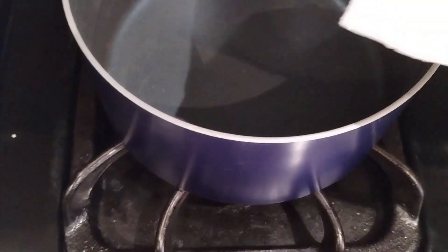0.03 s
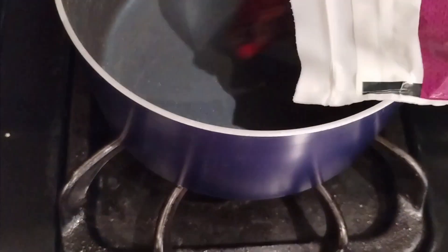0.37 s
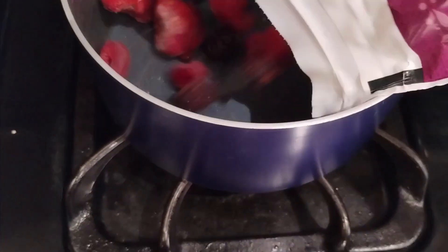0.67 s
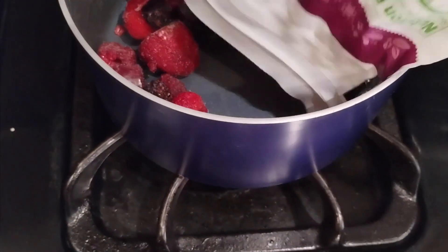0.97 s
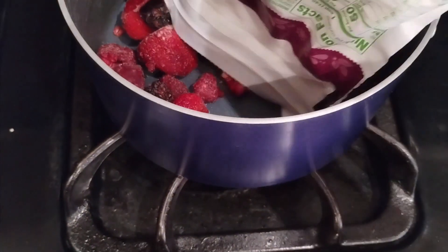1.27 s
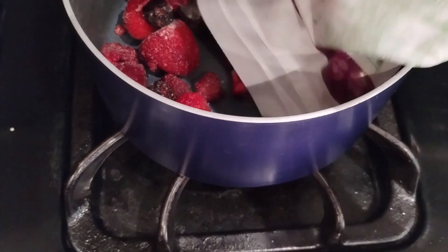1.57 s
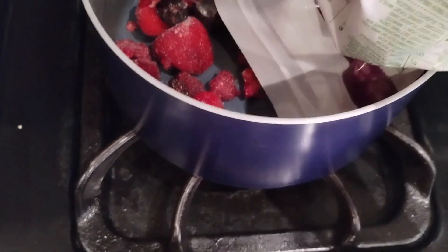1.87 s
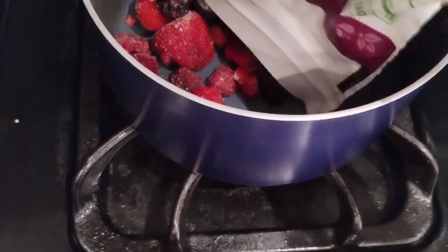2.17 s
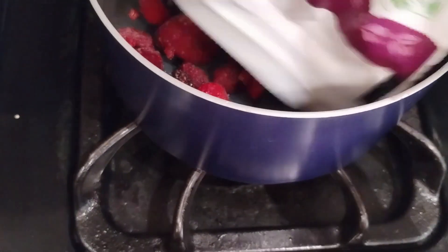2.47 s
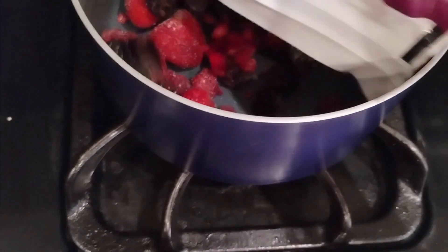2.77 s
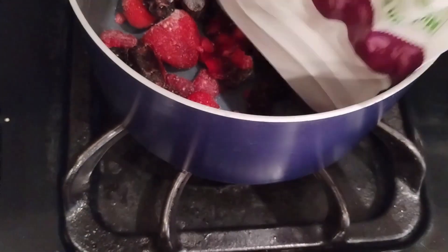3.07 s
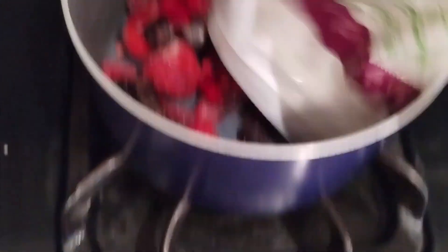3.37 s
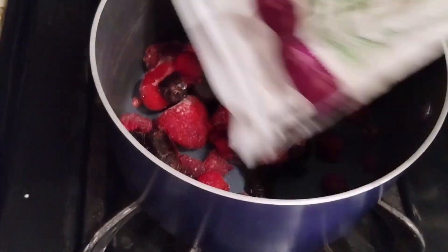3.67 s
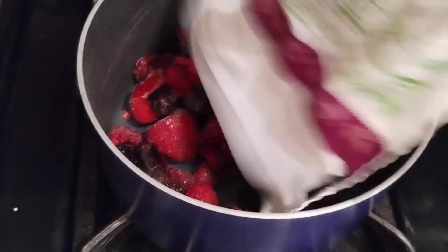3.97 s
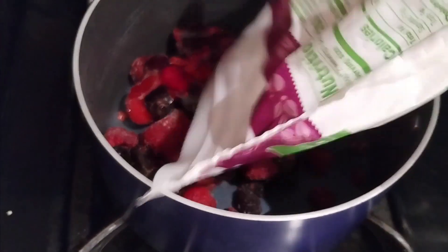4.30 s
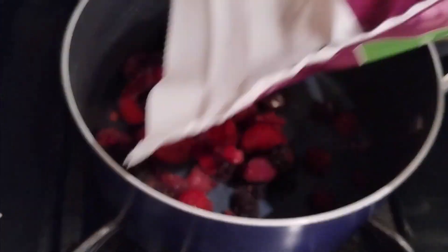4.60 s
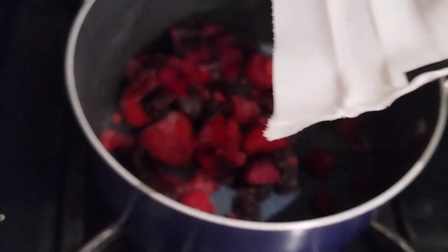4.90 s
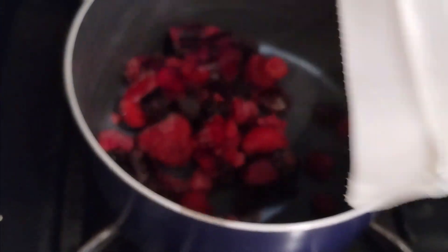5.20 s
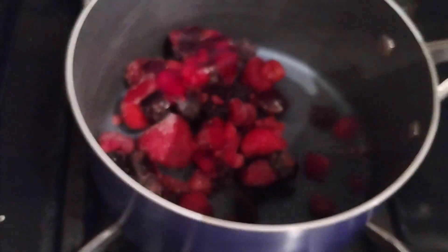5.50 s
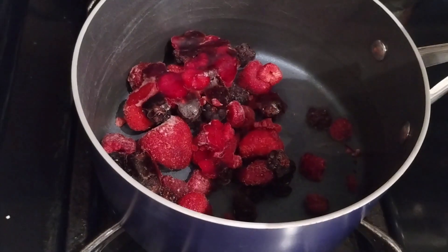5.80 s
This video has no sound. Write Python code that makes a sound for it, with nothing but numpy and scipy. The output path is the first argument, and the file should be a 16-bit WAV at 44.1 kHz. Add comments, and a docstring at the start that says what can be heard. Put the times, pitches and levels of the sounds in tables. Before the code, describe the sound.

A stiff plastic bag is shaken and crackles up close as hard frozen berries clatter onto a metal pan bottom.

```python
"""Frozen berries pour from a stiff plastic bag into a metal saucepan, close to a stereo microphone.
The bag crinkles and snaps as its creases buckle, and the berries tumble and clack together. They drop
out to knock and chatter on the pan bottom, which rings less as the heap grows; the pan rocks on its
stove grate. The empty bag is lifted away with a last crack, and a small, quiet kitchen answers."""
import sys
import numpy as np
from scipy import signal
from scipy.fft import rfft, irfft, next_fast_len
from scipy.io import wavfile
from scipy.ndimage import map_coordinates

SR = 44100
rng = np.random.default_rng(int(sys.argv[2]) if len(sys.argv) > 2 else 0)


def file_out(sig):
    """Save sig as 16-bit WAV at sys.argv[1]."""
    # one column per channel
    cols = np.atleast_2d(sig).T
    # limit, then scale
    lim = np.clip(cols, -1, 1)
    pcm = np.round(lim * 32767).astype(np.int16)
    wavfile.write(sys.argv[1], SR, pcm)


N = 257984

# Levels are relative; the functions set the balance.
# how hard the hand works the bag between shakes: t/s, level/dB
GRIP = [(0, -41.5), (.15, -31), (.45, -35), (1.2, -31), (1.3, -26.5), (1.55, -32.5), (1.9, -32),
        (2.3, -27.5), (2.9, -25), (3.11, -26.5), (3.2, -23), (3.75, -28.5), (3.85, -28), (4.15, -22),
        (4.35, -32.5), (4.55, -37.5), (4.68, -35.5), (4.71, -57.5), (5.15, -65.5), (5.4, -77)]
# shakes and squeezes of the bag: t/s, length/s, film level/dB, berry level/dB
BAG_SHAKES = [(0.173, 0.47, -21, -43), (0.335, 0.21, -19, -33.5), (0.99, 0.11, -26, -39.5),
              (1.413, 0.09, -25.5, -39), (1.633, 0.13, -24.5, -38.5), (1.801, 0.019, -26.5, -35),
              (1.911, 0.21, -27, -37), (2.206, 0.048, -29, -36), (2.395, 0.078, -17.5, -34.5),
              (2.575, 0.031, -12.5, -35), (2.641, 0.052, -11, -37.5), (2.769, 0.056, -22, -35),
              (2.883, 0.19, -21.5, -39.5), (3.135, 0.056, -16.5, -35), (3.278, .11, -16, -33.5),
              (3.416, 0.047, -19, -34.5), (3.469, 0.09, -11.5, -33), (3.649, 0.089, -15.5, -32.5),
              (3.889, 0.022, -11.5, -29), (3.954, 0.1, -14.5, -37.5), (4.058, 0.019, -9, -36.5),
              (4.206, 0.04, -11.5, -34.5), (4.275, 0.017, -9.5, -38), (4.364, 0.12, -21.5, -39.5)]
# spectra of the heavy bag flexing, berries tumbling in it and its film crinkling: f/Hz, level/dB
FLEX_SPECTRUM = [(24, -49), (40, -12.5), (145, -1), (436, -8.5), (650, -42), (1100, -120)]
TUMBLE_SPECTRUM = [(60, -36), (200, -3.5), (400, -1.5), (750, 5.5), (1200, 2.5), (1700, -1.5), (2600, 1.5),
                   (5000, -5)]
FILM_SPECTRUM = [(410, -5.5), (700, 2.5), (852, -28.5), (1210, -2.5), (1560, -9), (2490, 2.5), (2880, 1),
                 (3740, -5), (7590, -7), (9350, -1), (12300, -17), (16000, -23.5)]
# creases snapping through: t/s, level/dB, brightness/dB
CREASE_SNAPS = [(.179, -10.5, -12.5), (0.214, -12, -14), (0.279, -0.5, -8.5), (.322, -10, -21.5),
                (.342, -5.5, -13.5), (0.407, -4.5, -15.5), (0.493, -7.5, -8), (0.496, -4.5, -20),
                (1.597, -7.5, -18), (1.685, -10, -27), (1.696, -7.5, -9.5), (1.740, -0.5, -6),
                (1.799, -1.5, -17.5), (1.831, -10.5, -20.5), (1.937, -13, -22.5), (2.140, -9, -18),
                (2.236, -5, -24), (2.454, -9, -15), (2.536, -16, -15), (2.583, -5, -13), (2.6, -10.5, -12),
                (2.619, -1.5, -13.5), (2.637, -7, -11.5), (2.649, -4.5, -13), (2.692, -8, -21.5),
                (2.778, -6, -15), (2.806, -5, -26.5), (3.154, -1.5, -15.5), (3.169, -10.5, -18.5),
                (3.21, -4, -12), (3.219, -8.5, -20), (3.45, -8, -18), (3.489, -7, -30.5),
                (3.525, -8.5, -14.5), (3.543, -7, -15), (3.617, -5.5, -23.5), (3.777, -11, -20),
                (3.807, -6.5, -11), (3.875, -8, -16), (3.916, -11, -11), (3.937, -3.5, -13),
                (3.988, -10, -14.5), (4.042, -6, -17), (4.127, -4, -14), (4.158, -6, -15), (4.219, -7, -17),
                (4.273, -8.5, -10), (4.290, -8.5, -14), (4.301, -3.5, -12), (4.395, -11.5, -13.5),
                (4.427, -7.5, -10), (4.489, -9.5, -15), (4.504, -8, -8.5), (4.516, -4, -14.5),
                (4.522, -8.5, -26.5), (4.556, -15, -16.5), (4.607, -20, -16), (4.667, -18.5, -32),
                (4.795, -26, -16), (5.694, -37, -14)]
# bag and pan bumping the grate: t/s, level/dB
GRATE_BUMPS = [(0.424, -19.5), (1.048, -23.5), (1.463, -29), (1.522, -34.5), (1.753, -20), (2.019, -23.5),
               (2.771, -22.5), (3.027, -26.5), (3.141, -26.5), (3.342, -23.5)]
# berries landing: t/s, level/dB, bottom mode f/Hz, second mode/dB, chatter/dB, favoured overtone f/Hz
BERRY_LANDINGS = [(.502, -15.5, 628, -10, -13.5, 3120), (.565, -8, 637.5, -12, 1, 3080),
                  (.619, -10.5, 650, -11.5, 0, 8800), (.651, -19.5, 711, -0.5, 7, 3700),
                  (0.657, -26.5, 717, -7.5, 17.5, 5300), (.671, -24.5, 643, 4.5, -1, 2535),
                  (.693, -27, 616, 4.5, -2, 2430), (.716, -17, 653, -4.5, 11, 7200),
                  (.776, -20, 622.5, -17.5, 8.5, 3820), (.802, -16.5, 667, -6, 7.5, 3880),
                  (.817, -21, 634, -3.5, 7.5, 5860), (0.867, -15.5, 644, -6.5, 9, 6720),
                  (.963, -20, 660, -1, 4, 2390), (1.011, -14, 627, 0, -10.5, 2510),
                  (1.041, -14.5, 696, -1.5, -16, 3770), (1.154, -13, 677, -14, 7, 9180),
                  (1.172, -31.5, 676, -8.5, 7, 5000), (1.332, -4, 640, -11.5, 0.5, 2370),
                  (1.344, -21, 632, 8, 1, 3570), (1.492, -9.5, 665, -6, -12, 2560),
                  (2.483, -12.5, 665, -10, -2, 2520), (2.77, -4, 631, -22.5, -13.5, 3080),
                  (2.803, -15, 690, 0, 6.5, 2550), (2.878, -5.5, 684, -14, 0.5, 3650),
                  (3.024, -4.5, 664, -3.5, -19.5, 3060), (3.333, -4.5, 682, -2.5, -14, 3700),
                  (3.494, -8.5, 650, 0.5, -11, 9300)]
# the pan bottom's low modes, kept singing by rolling berries: f/Hz, width/Hz, level/dB
BOTTOM_MODES = [(636, 22, 0), (1296, 24, 7), (2535, 40, -5)]
# the pan bottom's overtones: f/Hz, level/dB
BOTTOM_OVERTONES = [(2537, -15.5), (3085, -18), (3775, -17), (4550, -20), (4970, -21), (5463, -19),
                    (7055, -22), (7373, -22), (8740, -21)]
# spectra of ice skidding on metal, a landing's thud, a big berry's thump and a dry knock: f/Hz, level/dB
SKID_SPECTRUM = [(880, -38.5), (1600, -8), (2490, -6.5), (2800, -12.5), (3150, -3.5), (4200, -4.5),
                 (6000, -2.5), (7100, -7.5), (9010, -2.5), (11500, -14.5), (16000, -31)]
THUD_SPECTRUM = [(250, -22), (700, 6), (5000, 4), (9000, -19.5)]
THUMP_SPECTRUM = [(30, -20), (100, 9), (250, -13.5), (900, -47), (3000, -89)]
KNOCK_SPECTRUM = [(400, 1.5), (1000, 1.5), (3500, -3.5), (8000, -14.5)]
# berries striking each other, and at the end the empty bag's edge touching the pan: t/s, level/dB, f/Hz
DRY_KNOCKS = [(0.8699, -4.5, 7060), (1.1539, -0.5, 2030), (1.157, -10, 1840), (1.345, -5.5, 2412),
              (1.4235, -11.5, 1868), (4.607, -22.5, 1000), (1.804, -10.5, 1500), (2.0085, -6, 2594),
              (2.4825, -5, 1650), (2.931, -4, 4900), (2.9884, -4, 1500), (3.0655, -6.5, 1936),
              (3.261, -8, 3300), (2.236, -14, 2980), (4.0227, -4, 2550), (4.072, -9.5, 421)]
# modes of the pan's free wall: f/Hz, level/dB, t60/s
WALL_MODES = [(3187, 0, .9), (3305, -2, .4), (4237, -10, .5), (4560, 3, .16), (5000, -9, .4)]
# whole folds springing open: t/s, level/dB, t60/s
FOLD_CRACKS = [(4.88, -14.5, .16), (5.501, -51, .13)]
# spectrum of a fold's crack: f/Hz, level/dB
FOLD_SPECTRUM = [(600, -24.5), (1600, -16), (2950, -5), (4200, -12.5), (5480, -3.5), (9360, 2),
                 (14500, -12), (16000, -40.5)]
# the kitchen's reverberation time: f/Hz, t60/s
ROOM_DECAY = [(200, 0.57), (2000, 0.15), (12000, 0.096)]
# spectra of the kitchen's reverberation and its room tone: f/Hz, level/dB
REVERB_SPECTRUM = [(400, -6.5), (1000, -4.5)]
ROOM_TONE = [(20, -17.5), (82, 2), (242, 0), (560, -8), (2220, -20), (2480, -13), (2990, -22), (8140, -24),
             (9840, -21), (11000, -33)]
# likeness of left and right at the microphone: f/Hz, correlation
STEREO_LIKENESS = [(30, .7), (120, .94), (700, .7), (1300, .45), (3000, 0)]
# colour of the left microphone port against the right: f/Hz, level/dB
PORT_BALANCE = [(100, -1.5), (1100, -2.5), (1800, 2), (2600, 10), (4100, 4), (5500, 4), (7000, 1),
                (9600, -17.5), (11500, -9.5), (14000, -1.5)]

SHAKE_RISE_S, FILM_T60_S, BERRY_T60_S = .012, .085, .14  # a shake builds up, then settles
CLUMP_DB, CLUMPS_PER_S = 3.8, 130  # creases give way in little avalanches
PANEL_HZ, PANEL_OCTAVES_PER_DB = 11000, .075  # the film's smallest panel; duller snaps ring lower
FILL_S = .55  # time for berries to cover the pan bottom
BARE_RING_S, COVERED_RING_S = .29, .065  # t60 of the bottom
BARE_CHATTER_S, COVERED_CHATTER_S = .14, .074  # t60 of a berry's chatter
SPOT_SPREAD_DB, SPOT_DETUNE, FAVOURED_DB = 3, .005, -13  # overtones vary with the landing spot
PAN_LOW_HZ = 398.5  # the bottom radiates little below this


def amp(db):
    """Decibels to gain."""
    return 10 ** (np.asarray(db) / 20)


def unit(x):
    """x at rms 1."""
    return x / np.sqrt(np.mean(x ** 2) + 1e-20)


def along(points, hz):
    """Interpolate (f/Hz, value) points on a log axis."""
    f, values = np.transpose(points)
    return np.interp(np.log(hz + 1), np.log(f + 1), values)


def filtered(x, response):
    """x through a complex frequency response."""
    size = next_fast_len(x.shape[-1] + SR // 20)
    return irfft(rfft(x, size) * response(np.fft.rfftfreq(size, 1 / SR)), size)[..., :x.shape[-1]]


def fade(t, t60):
    """Exponential decay, 60 dB in t60."""
    return np.exp(-np.log(1000) * t / max(t60, 1e-4))


def wobble(rate):
    """A smooth random curve, rate knots a second."""
    return map_coordinates(rng.standard_normal(N // 100), [np.arange(N) * rate / SR], mode="mirror")


def add(track, s, sound):
    """Mix a sound into the track at time s."""
    part = track[:, max(round(s * SR), 0):][:, :sound.shape[-1]]
    part += sound[..., :part.shape[1]]


def coloured(pair, spectrum):
    """Shape two unrelated signals into stereo of rms 1: shared bass, separate treble."""
    def response(hz):
        angle = np.arccos(np.clip(along(STEREO_LIKENESS, hz), -1, 1)) / 2
        return amp(along(spectrum, hz)) * np.array([np.cos(angle), np.sin(angle)])
    mid, side = filtered(pair, response)
    return unit(np.array([mid + side, mid - side]))


def resonance(f, hz, width):
    """Response of one damped mode, 1 at its centre."""
    return 1j * f * width / (hz * hz - f * f + 1j * f * width)


def ring(modes, t):
    """Decaying modes, each reaching left and right in a different phase."""
    return sum(amp(db) * fade(t, t60)
               * np.sin(2 * np.pi * (hz * t + rng.random()) + 2 * rng.random((2, 1)))
               for hz, db, t60 in modes)


def click(t60, tail_db, sweep_s, hz, broad_db=-12):
    """One contact ringing near hz: bending waves bring the treble first and 3 kHz sweep_s later."""
    t = np.arange(SR // 16) / SR
    burst = rng.standard_normal((2, len(t))) * (fade(t, t60) + amp(tail_db) * fade(t, .035))
    bending = lambda f: np.exp(-4j * np.pi * sweep_s * np.sqrt(3000 * f))
    return unit(filtered(burst, lambda f: bending(f) * (amp(broad_db) + resonance(f, hz, hz / 2))))


def grains(rate, spread_db, t60, low_hz, high_hz, spots=12):
    """Random small contacts of uneven size, from spots that each have their own pitch."""
    out, place = np.zeros((2, N)), rng.integers(spots, size=N)
    hits = (rng.random(N) < rate / SR) * amp(spread_db * np.clip(rng.standard_normal(N), -2, 1.6))
    for k, hz in enumerate(np.geomspace(low_hz, high_hz, spots)):
        contact = np.sqrt(hz) * click(t60, tail_db=-14, sweep_s=.0012, hz=hz, broad_db=-24)
        out += signal.oaconvolve((hits * (place == k))[None], contact, axes=1)[:, :N]
    return out


def handling():
    """Gains of film and berries: each shake rises, holds and settles over the held bag's unrest."""
    t = np.arange(N) / SR
    held = amp(np.interp(t, *np.transpose(GRIP), right=-120))
    film_power, berry_power = held ** 2, (amp(-17.5) * held) ** 2
    for s, length, film_db, berry_db in BAG_SHAKES:
        rise = np.clip((t - s) / SHAKE_RISE_S + .5, 0, 1)
        after = np.clip(t - s - length, 0, 1)
        film_power += (amp(film_db) * rise * fade(after, FILM_T60_S)) ** 2
        berry_power += (amp(berry_db) * rise * fade(after, BERRY_T60_S)) ** 2
    return np.sqrt(film_power), np.sqrt(berry_power)


def bag_rustle():
    """Shaking flexes the bag with a rumble, rolls the berries over each other and crumples the film."""
    film_gain, berry_gain = handling()
    lumps = amp(3 * wobble(rate=55))
    flex = berry_gain * unit(lumps * coloured(rng.standard_normal((2, N)), FLEX_SPECTRUM))
    contacts = grains(rate=500, spread_db=3.5, t60=.012, low_hz=276, high_hz=2800, spots=18)
    tumble = amp(6.5) * berry_gain * coloured(contacts, TUMBLE_SPECTRUM)
    creases = grains(rate=2000, spread_db=5, t60=.008, low_hz=1300, high_hz=14000, spots=20)
    clumps = amp(CLUMP_DB * wobble(CLUMPS_PER_S))
    crinkle = amp(-5.5) * film_gain * coloured(creases * clumps, FILM_SPECTRUM)
    return flex + tumble + crinkle


def crease_snaps():
    """Single creases buckle with a falling chirp, the dull ones for longer."""
    out = np.zeros((2, N))
    for s, db, bright_db in CREASE_SNAPS:
        body_db = -2 + .3 * db  # strong snaps move more of the film
        panel_hz = PANEL_HZ * 2 ** (PANEL_OCTAVES_PER_DB * bright_db)  # bright snaps free small panels
        run_s = .005 - .00045 * bright_db
        buckle = click(t60=run_s, tail_db=-12, sweep_s=.0015, hz=panel_hz, broad_db=-2)
        tilt = [(1100, body_db), (2700, 0), (5500, 0), (9500, bright_db + 17)]
        snap = filtered(coloured(buckle, FILM_SPECTRUM), lambda hz: amp(along(tilt, hz)))
        add(out, s - .001, amp(db - 20.5) * unit(snap))
    return out


def grate_bumps():
    """The whole pan rocks on its grate with a low note that swells and dies."""
    out, t = np.zeros((2, N)), np.arange(SR) / SR
    for s, db in GRATE_BUMPS:
        hz = 149 + 4 * rng.standard_normal()
        envelope = fade(t, .2) * (1 - np.exp(-t / .029))
        add(out, s, amp(db + 5.5) * envelope * np.sin(2 * np.pi * hz * t))
    return out


def landings():
    """Each berry knocks the pan bottom, then chatters and rolls; every spot has its own overtones."""
    out, t = np.zeros((2, N)), np.arange(SR // 3) / SR
    skid = coloured(grains(rate=6000, spread_db=-1, t60=.011, low_hz=1500, high_hz=11000), SKID_SPECTRUM)
    bend = 1 + .011 * wobble(rate=60)  # the moving load bends the low modes' pitch
    bottom = lambda f: sum(amp(db) * resonance(f, hz, width) for hz, width, db in BOTTOM_MODES)
    for s, db, hz, second_db, chatter_db, favoured_hz in BERRY_LANDINGS:
        now = slice(round(s * SR), round(s * SR) + len(t))
        bare = np.exp(-((s - BERRY_LANDINGS[0][0]) / FILL_S) ** 2)  # the growing heap damps the pan
        ring_s = COVERED_RING_S + (BARE_RING_S - COVERED_RING_S) * bare
        chatter_s = COVERED_CHATTER_S + (BARE_CHATTER_S - COVERED_CHATTER_S) * bare

        mode = lambda f, t60: np.sin(2 * np.pi * f * np.cumsum(bend[now]) / SR) * fade(t, t60)
        drum = mode(hz, ring_s) - amp(-10) * mode(778, .044)
        second = mode(1298 + 12 * rng.standard_normal(), .7 * ring_s)
        second += amp(-7) * mode(1270 + 80 * rng.standard_normal(), .07)
        thud = coloured(click(t60=.027, tail_db=15.5, sweep_s=.00026, hz=903), THUD_SPECTRUM)
        add(out, s, amp(db - 3.5) * (drum - amp(second_db) * second))
        add(out, s, amp(db - 27) * thud)

        overtones = [(f * (1 + SPOT_DETUNE * rng.standard_normal()),
                      level + SPOT_SPREAD_DB * rng.standard_normal(), ring_s)
                     for f, level in BOTTOM_OVERTONES]
        overtones.append((favoured_hz, FAVOURED_DB, ring_s))
        ping = (1 - np.exp(-t / .0013)) * ring(overtones, t)
        contact = fade(t, chatter_s) * np.sqrt(1 - np.exp(-t / .016))
        chatter = amp(-2) * contact * skid[:, now]
        roll = amp(12) * filtered(contact * rng.standard_normal(len(t)), bottom)
        add(out, s, amp(db + chatter_db) * (ping + chatter + roll))
    return filtered(out, lambda f: 1j * f / PAN_LOW_HZ * resonance(f, PAN_LOW_HZ, PAN_LOW_HZ))


def big_berry_thump():
    """The pan gives one dull thump under a big berry."""
    out, t = np.zeros((2, N)), np.arange(SR) / SR
    push = coloured(rng.standard_normal((2, len(t))), THUMP_SPECTRUM)
    add(out, s=.716, sound=amp(-25) * push * fade(t, .11))
    return out


def dry_knocks():
    """Short knocks: berries strike each other, and at the end the empty bag's edge touches the pan."""
    out = np.zeros((2, N))
    for s, db, hz in DRY_KNOCKS:
        knock = click(t60=.017, tail_db=-6.5, sweep_s=.00018, hz=hz, broad_db=-36)
        add(out, s, amp(db - 21.5) * coloured(knock, KNOCK_SPECTRUM))
    return out


def wall_tap():
    """One berry taps the pan's free wall, which rings long and high."""
    out, t = np.zeros((2, N)), np.arange(SR) / SR
    add(out, s=2.929, sound=amp(-22.5) * ring(WALL_MODES, t))
    return out


def fold_cracks():
    """A whole fold springs open: the crack runs across the empty bag, then dies."""
    out, t = np.zeros((2, N)), np.arange(SR // 3) / SR
    for s, db, t60 in FOLD_CRACKS:
        envelope = fade(np.maximum(t - .008, 0), t60) * (1 - np.exp(-t / .001))
        add(out, s, amp(db - 5) * envelope * coloured(rng.standard_normal((2, len(t))), FOLD_SPECTRUM))
    return out


def kitchen_reverb(near):
    """The small room answers 5 ms later: a short tail, longest in the bass, and a faint late ring."""
    hz, t, noise = signal.stft(rng.standard_normal((2, SR // 2)), SR, nperseg=256)
    decay = np.exp(-np.log(1000) * t / along(ROOM_DECAY, hz)[:, None])
    late_ring = amp(-14.5) * fade(t, .33)
    tail = coloured(signal.istft(noise * (decay + late_ring), SR, nperseg=256)[1], REVERB_SPECTRUM)
    tail = np.pad(tail / np.linalg.norm(tail[0]), ((0, 0), (SR // 200, 0)))
    return signal.fftconvolve(near, tail, axes=1)[:, :N]


def scene():
    """Pan and bag close up, with the kitchen's reverberation and faint room tone behind them."""
    impacts = landings() + dry_knocks() + wall_tap() + grate_bumps() + big_berry_thump()
    bag = crease_snaps() + fold_cracks() + bag_rustle()
    near = impacts + bag
    reverb = amp(-10.5) * kitchen_reverb(near)
    room_tone = amp(-66.5) * coloured(rng.standard_normal((2, N)), ROOM_TONE)
    return near + reverb + room_tone


def record(dry):
    """Two microphone ports of unlike colour, the right a little earlier; rounded peaks, limited band."""
    lead_s, low_cut_hz, top_hz, ceiling = .00014, 45, 15900, .95

    def ports(hz):
        sides = np.array([[1], [-1]])
        gain = amp(sides * along(PORT_BALANCE, hz) / 2)
        lag = np.exp(-1j * np.pi * sides * hz * lead_s)
        low_cut = (1j * hz / (low_cut_hz + 1j * hz)) ** 2
        return gain / np.sqrt(np.mean(gain ** 2, 0)) * lag * low_cut
    picked_up = filtered(dry, ports)
    rounded = picked_up / (1 + np.abs(picked_up / ceiling) ** 6) ** (1 / 6)
    return filtered(rounded, lambda hz: hz < top_hz)


dry = scene()
out = record(dry)
file_out(out)
```